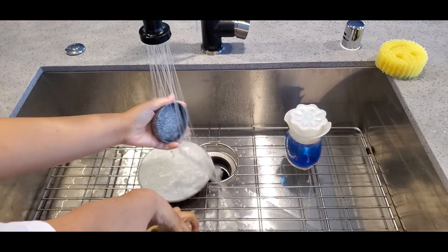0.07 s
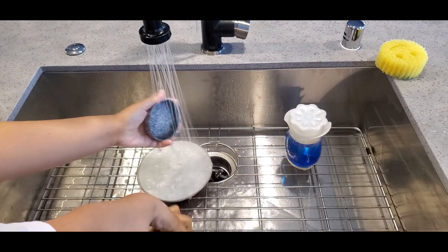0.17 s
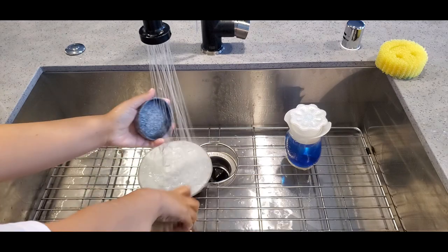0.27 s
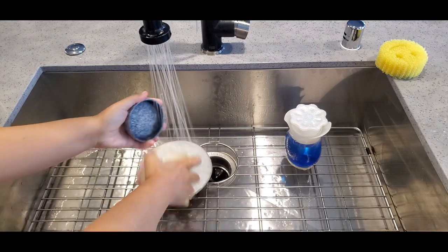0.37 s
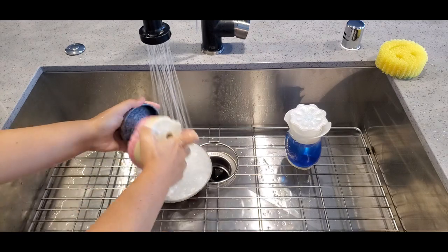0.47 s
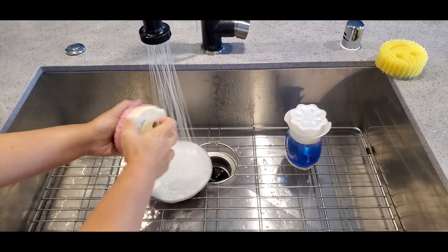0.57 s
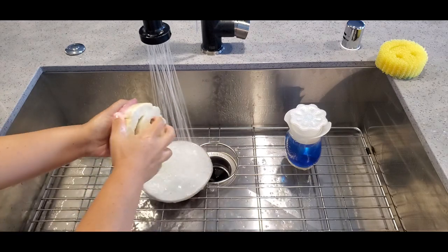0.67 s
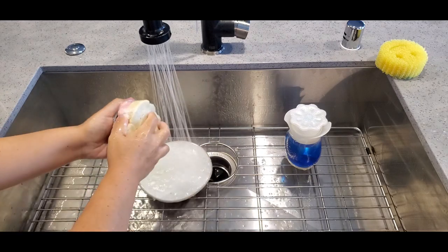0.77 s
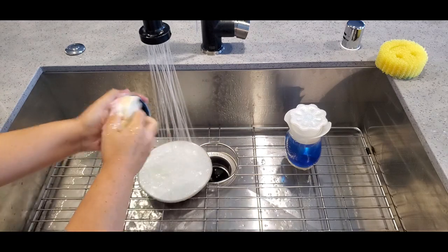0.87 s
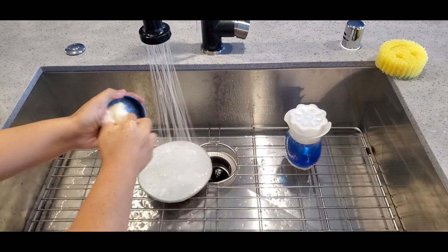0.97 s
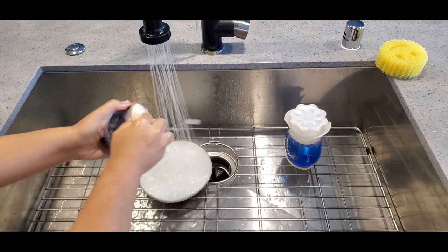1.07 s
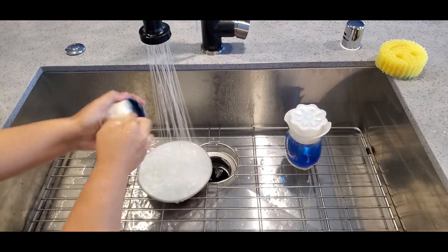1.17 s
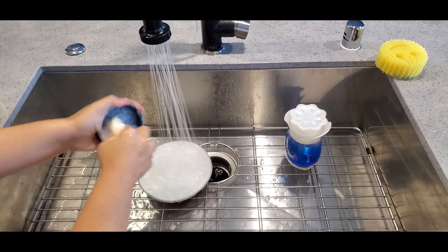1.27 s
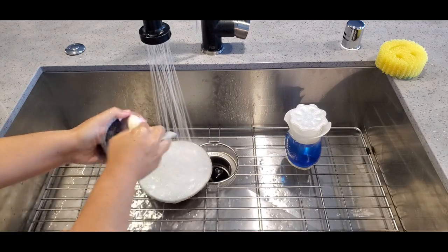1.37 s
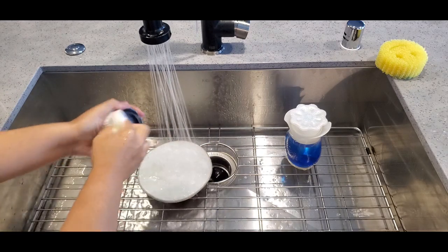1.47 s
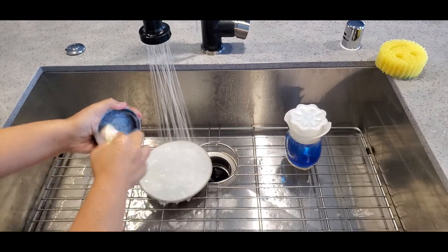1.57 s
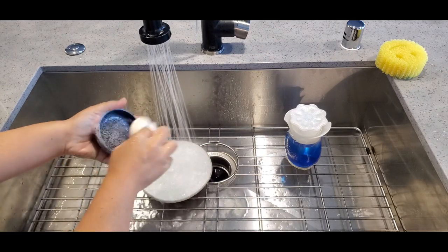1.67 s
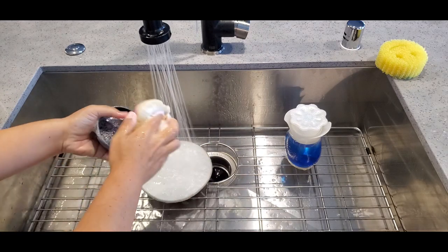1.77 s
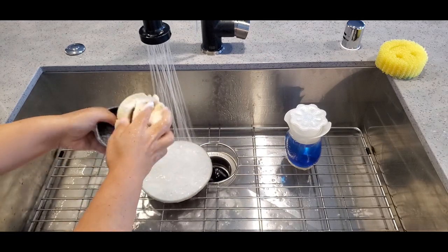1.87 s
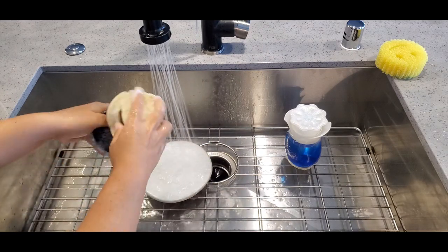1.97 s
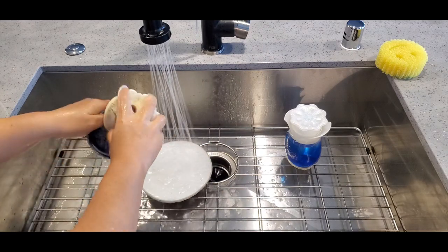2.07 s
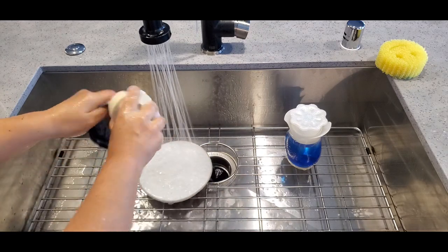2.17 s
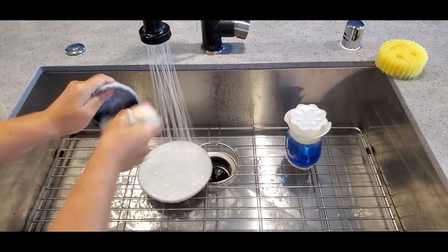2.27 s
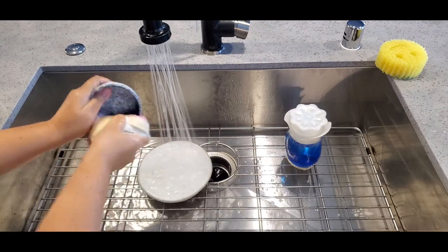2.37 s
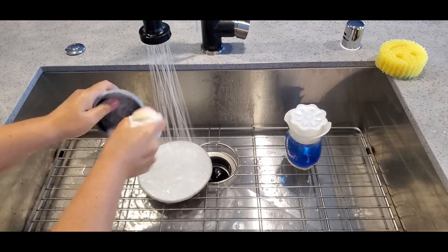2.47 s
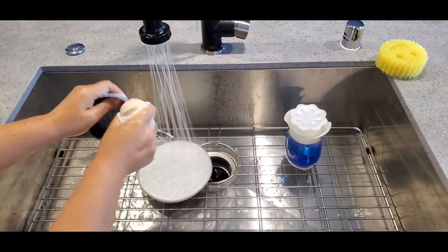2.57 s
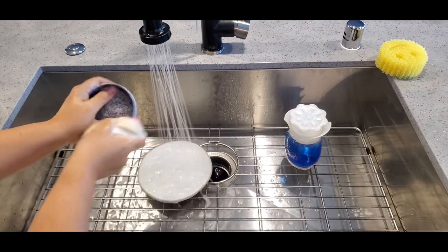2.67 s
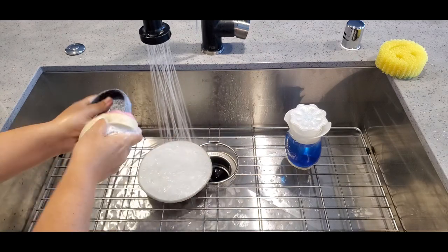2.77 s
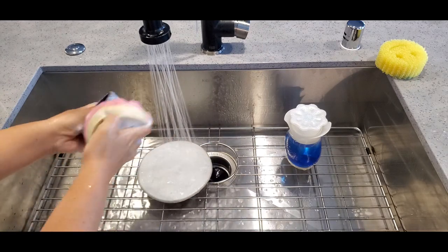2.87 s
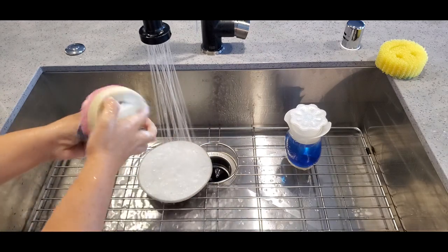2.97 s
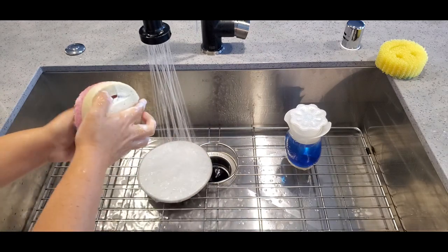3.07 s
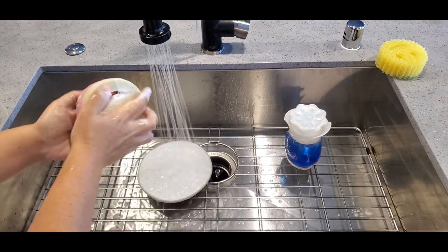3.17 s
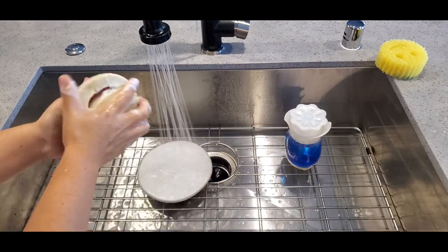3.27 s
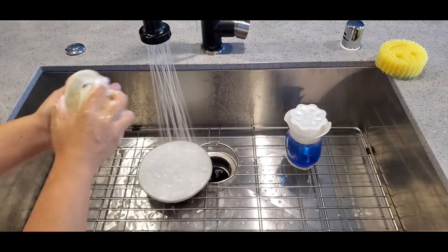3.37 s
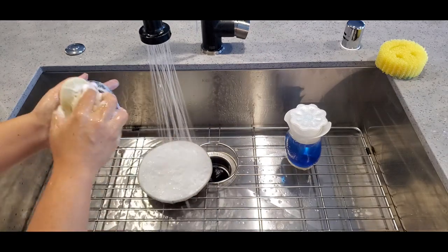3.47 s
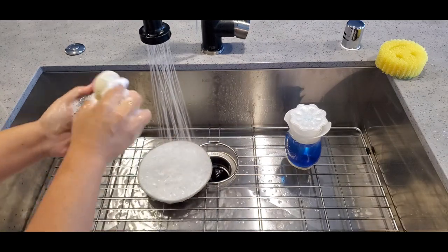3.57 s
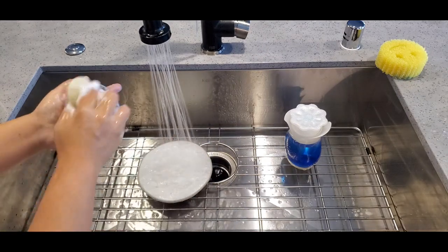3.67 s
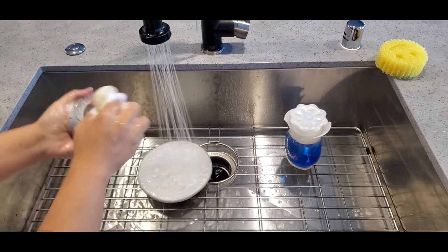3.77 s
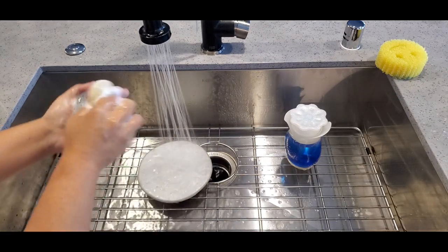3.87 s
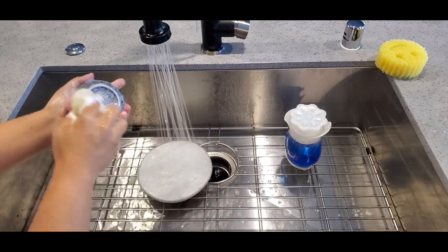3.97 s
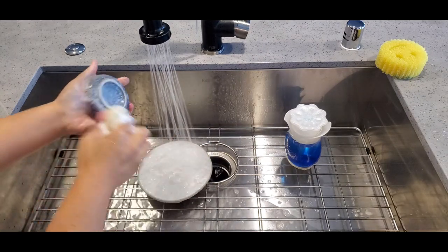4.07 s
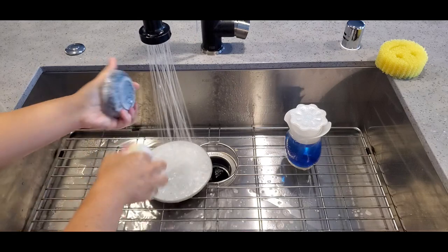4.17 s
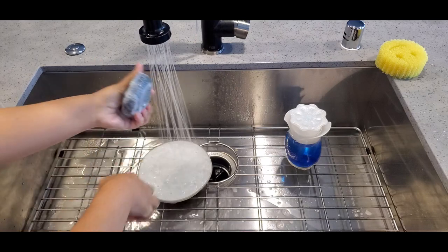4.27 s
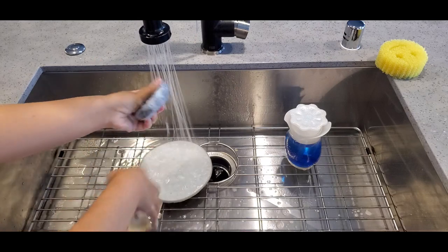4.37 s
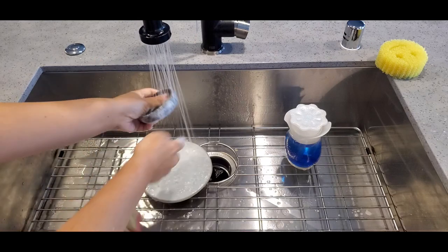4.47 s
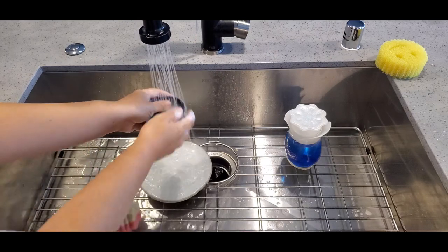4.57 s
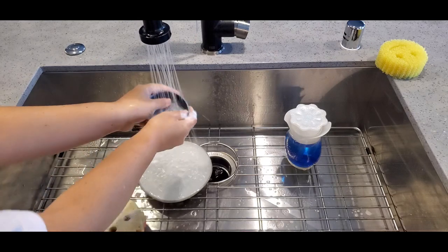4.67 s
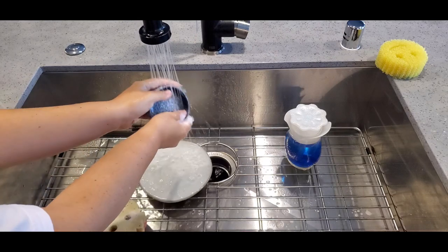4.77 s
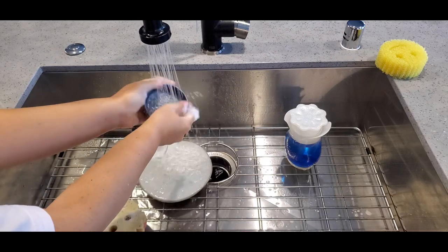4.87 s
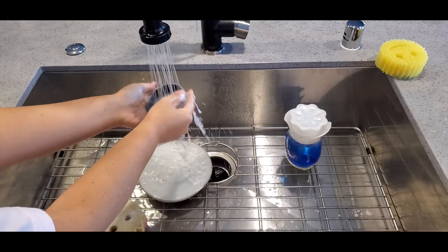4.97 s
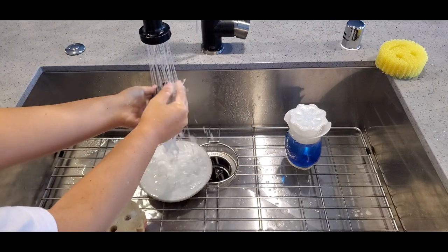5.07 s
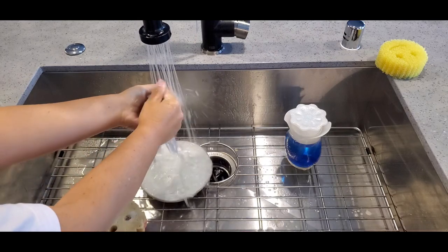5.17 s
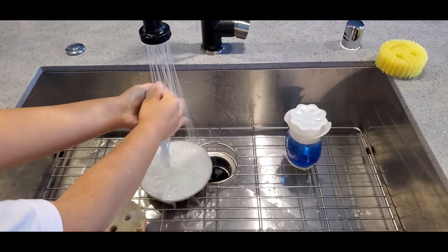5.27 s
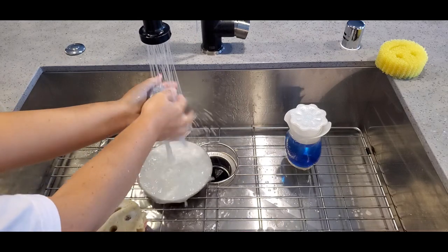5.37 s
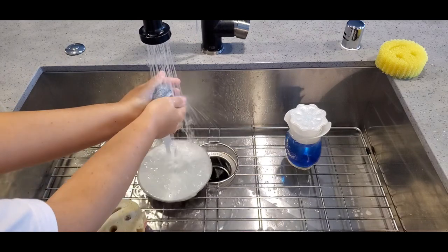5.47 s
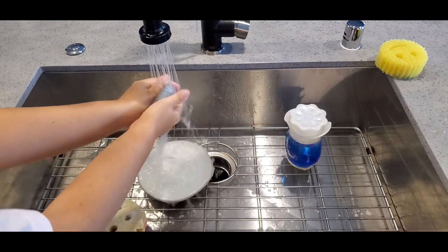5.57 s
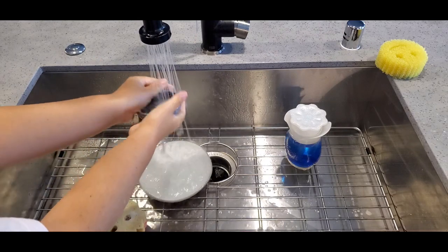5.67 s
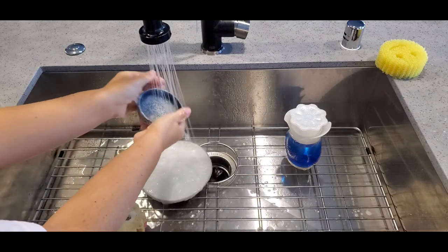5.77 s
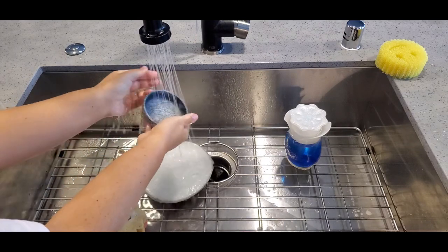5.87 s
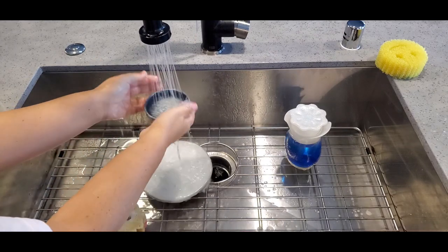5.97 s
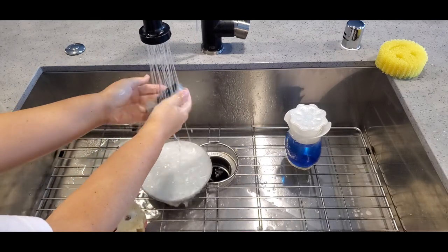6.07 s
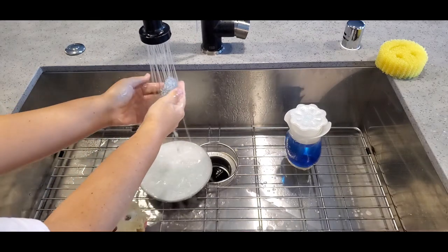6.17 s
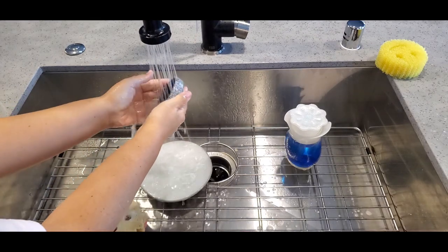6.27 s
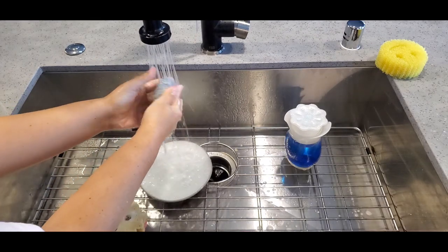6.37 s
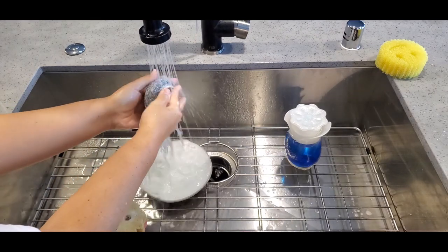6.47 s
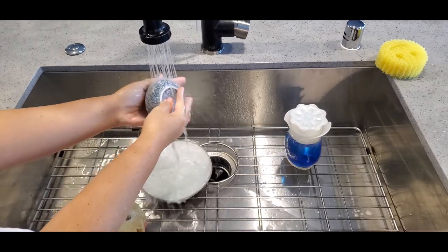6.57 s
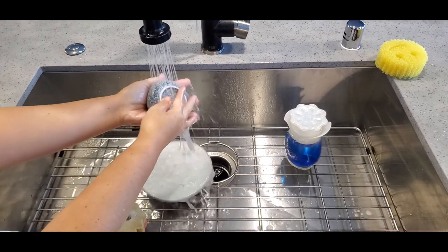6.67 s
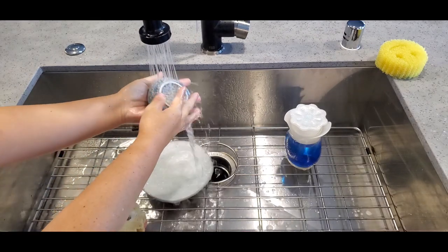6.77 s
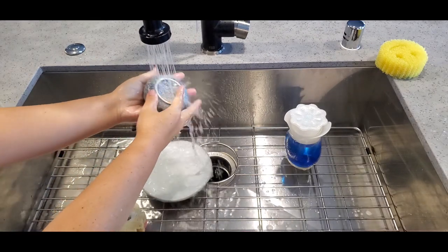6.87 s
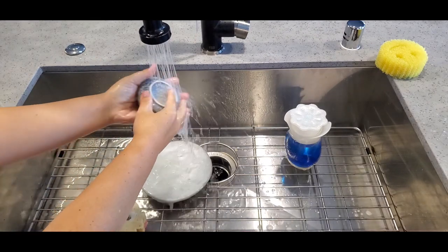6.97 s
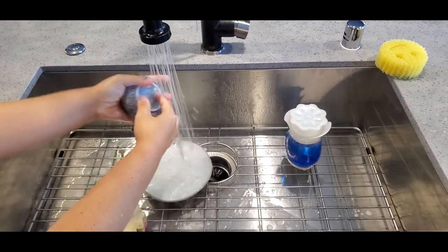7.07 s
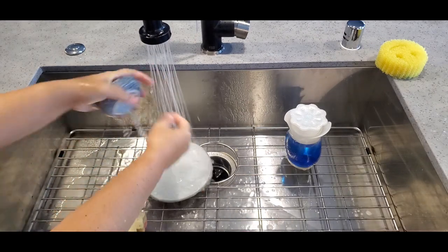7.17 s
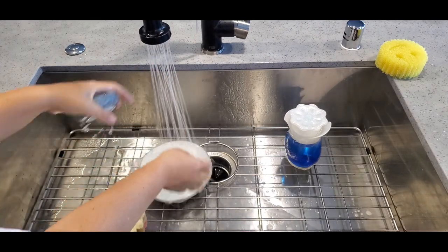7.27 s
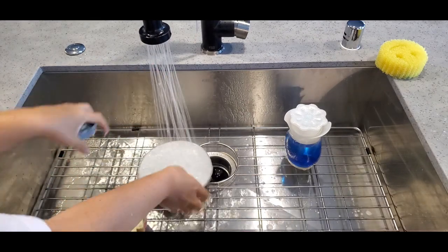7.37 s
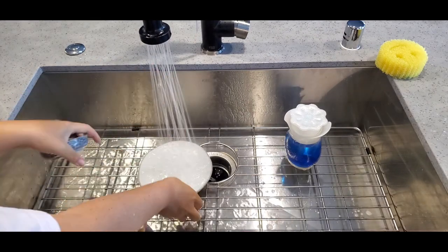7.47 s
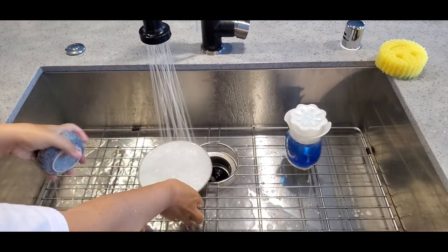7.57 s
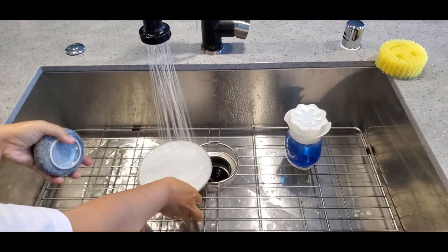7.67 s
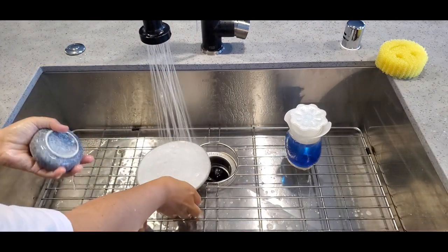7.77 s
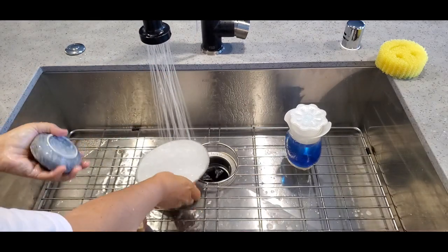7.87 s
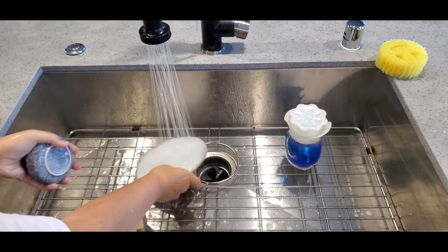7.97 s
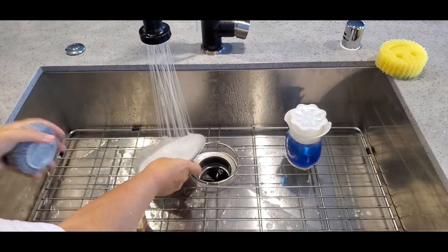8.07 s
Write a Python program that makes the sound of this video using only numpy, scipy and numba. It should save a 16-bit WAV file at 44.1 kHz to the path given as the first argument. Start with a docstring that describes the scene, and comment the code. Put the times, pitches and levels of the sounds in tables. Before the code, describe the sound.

A kitchen tap sprays into a steel sink throughout, heard close and slightly to the left, over a low basin rumble and faint room hum. It opens with a soft thump and small sloshes as water spills from a cup. From about 0.7 to 4.4 seconds the spray is a steady, bright spatter, bubbling into a shallow bowl, with two faint ticks around 1.2 and 1.5 seconds. From 4.5 to 7.2 seconds hands rinse the cup in the stream: the spray becomes quieter and patchy, with scattered drips, splashes and short gurgles, and dull thumps near 4.7 and 6.5 seconds. At about 7.2 seconds water sloshes out and the full spray and bubbling return. From 7.3 seconds to the end, just after 8, several light, hollow knocks sound as the bowl bumps the sink rack.

```python
"""A kitchen tap sprays into a brimming bowl on the rack of a steel sink while a cup is scrubbed and rinsed.
The jets spatter as dense droplet clicks and drive ringing bubbles into the bowl; hands in the spray
muffle this and shed drops. Water sloshes in cup and bowl at the pitch of the trapped air.
The tub rumbles, and its modes boom when it is bumped; the kitchen hums below."""
import sys
import numpy as np
from scipy import signal
from scipy.fft import rfft, irfft, next_fast_len
from scipy.io import wavfile
from numba import njit

SR = 44100
rng = np.random.default_rng(int(sys.argv[2]) if len(sys.argv) > 2 else 0)


def generate_wav(sig):
    """Save sig (samples, or channels by samples) to the path in sys.argv[1] as 16-bit PCM at SR."""
    pcm = np.round(np.clip(np.atleast_2d(sig).T, -1, 1) * 32767).astype(np.int16)
    wavfile.write(sys.argv[1], SR, pcm)


N = 358091
FFT_SIZE = next_fast_len(N)
BIN_HZ = np.maximum(np.arange(FFT_SIZE // 2 + 1) * SR / FFT_SIZE, 1)
CUTOFF_HZ = 15780


def from_db(db):
    """dB to gain."""
    return 10 ** (np.asarray(db) / 20)


def in_time(rows, at_s):
    """Columns of a curve table at the given times."""
    t_s, *columns = np.transpose(rows)
    return [np.interp(at_s, t_s, column) for column in columns]


def at_hz(rows, hz):
    """Spectrum table, interpolated over log frequency."""
    f_hz, values = np.transpose(rows)
    return np.interp(np.log(hz), np.log(f_hz), values)


def drift(rate_hz):
    """Slow random curve, rms 1."""
    hop = 20
    pole = np.exp(-2 * np.pi * rate_hz * hop / SR)
    slow = signal.lfilter([1], [1, -2 * pole, pole ** 2], rng.standard_normal(N // hop + 3002))[3000:]
    return np.interp(np.arange(N) / hop, np.arange(len(slow)), slow / np.sqrt(np.mean(slow ** 2)))


# Stereo field: f/Hz, left-right correlation
CORRELATION = [(60, 0.92), (130, 1), (290, 0.77), (640, -0.32), (1410, -0.41), (3100, 0.46), (6820, -0.41),
               (15000, 0.049)]


def coloured(pair, spectrum, flicker_db=0, flicker_hz=0):
    """Two independent streams to shaped stereo, mid rms 1; strong treble third-octaves can flicker."""
    mid, side = rfft(pair, FFT_SIZE) * from_db(at_hz(spectrum, BIN_HZ))
    alike = np.clip(at_hz(CORRELATION, BIN_HZ), -.95, .99)
    stereo = np.sqrt(1 + alike) * mid + np.sqrt(1 - alike) * side * [[1], [-1]]
    stereo[1] *= np.exp(-4j * np.pi * BIN_HZ / SR)  # right lags 2 samples
    out = irfft(stereo, FFT_SIZE)[:, :N]
    for octave in np.arange(np.log2(2500), 14, 1 / 3):
        if flicker_hz and at_hz(spectrum, 2 ** octave) > -15:
            window = np.cos(np.pi / 2 * np.clip(3 * (np.log2(BIN_HZ) - octave), -1, 1)) ** 2
            band = irfft(stereo * window, FFT_SIZE)[:, :N]
            out += band * (from_db(flicker_db * drift(flicker_hz)) - 1)
    return out / np.sqrt(np.mean(out.mean(axis=0) ** 2))


def impacts(per_s, uneven_db):
    """Two streams of droplet clicks of uneven size."""
    sizes = from_db(uneven_db * np.minimum(rng.exponential(1, (2, N)), 5)) * rng.standard_normal((2, N))
    return sizes * (rng.random((2, N)) < per_s / SR)


# Spray as hands and cup move through the jets: t/s, spatter level/dB, mist level/dB
SPRAY_LEVELS = [(0.0, -55, -49), (0.05, -49.5, -38), (0.09, -50.5, -42), (0.16, -40, -36.5),
                (0.36, -41.5, -34), (0.5, -39, -37.5), (0.75, -37, -33.5), (4.34, -36.5, -33.5),
                (4.52, -42, -40), (4.64, -44.5, -35.5), (4.74, -48, -45), (4.82, -43.5, -39.5),
                (4.98, -49, -40.5), (5.06, -52.5, -42.5), (5.17, -49.5, -41), (5.2, -43, -40),
                (5.28, -43, -42), (5.34, -50, -48), (5.76, -51.5, -41.5), (5.79, -44.5, -37.5),
                (5.92, -43, -35.5), (6.0, -49.5, -38), (6.12, -41.5, -40), (6.37, -48, -42),
                (6.41, -51, -48), (6.47, -47, -44), (6.69, -49.5, -47), (6.89, -45.5, -42),
                (6.99, -50, -43), (7.05, -44, -40), (7.25, -40, -37), (7.45, -37.5, -33.5),
                (7.87, -37, -34), (8.12, -45, -39)]
# Droplet spectra, coarse to fine: f/Hz, relative density/dB
SPATTER_SPECTRUM = [(60, -48), (300, -19.5), (700, -13), (1300, -3.5), (2500, -1), (4000, 0), (5500, 0),
                    (6500, -0.5), (7600, 1), (8400, -10.5), (10000, -53), (16000, -52)]
SIZZLE_SPECTRUM = [(500, -55), (4000, -41), (7500, 1), (8500, -0.5), (10000, 2), (11300, -5), (12500, -12),
                   (16000, -40)]
MIST_SPECTRUM = [(500, -50), (5000, -25), (10000, -7), (11500, 1.5), (12500, 3.5), (13500, 2.5), (15200, 8),
                 (16500, -12.5)]


def spray():
    """Jets break into spatter, sizzle and mist; hands make them quieter and patchier."""
    spatter_db, mist_db = in_time(SPRAY_LEVELS, np.arange(N) / SR)
    open_jets_db = -37
    sizzle_db = -40.5 + 1.29 * (spatter_db - open_jets_db)  # sinks faster than the spatter
    broken = np.clip((-31.5 - spatter_db) / 11, .3, 1)
    gusts = drift(rate_hz=54)  # uneven break-up swells all three together
    spatter = coloured(impacts(14000, uneven_db=2), SPATTER_SPECTRUM, 2.82 * broken, flicker_hz=14)
    sizzle = coloured(impacts(9000, uneven_db=2), SIZZLE_SPECTRUM, 3 * broken, flicker_hz=14)
    mist = coloured(impacts(9000, uneven_db=-1), MIST_SPECTRUM, flicker_db=1, flicker_hz=17)
    return (from_db(spatter_db + .34 * gusts) * spatter
            + from_db(sizzle_db + .27 * gusts) * sizzle
            + from_db(mist_db + .18 * gusts) * mist)


@njit
def ring_bubbles(start, hz, gain, cycles, rise, swell):
    """Each bubble is a sine that swells, decays 60 dB per `cycles` and climbs as it nears the surface."""
    out = np.zeros((2, N))
    for i in range(len(hz)):
        t60_samples = cycles[i] / hz[i] * SR
        fade, step = 1000 ** (-1 / t60_samples), 2 * np.pi * hz[i] / SR
        phase, level = 0., 1.
        for n in range(min(int(.55 * t60_samples), N - max(start[i, 0], start[i, 1]))):
            phase += step * (1 + rise[i] * n / t60_samples)
            level *= fade
            sample = np.sin(phase) * level * min(1, n / (swell * t60_samples))
            out[0, start[i, 0] + n] += gain[i, 0] * sample
            out[1, start[i, 1] + n] += gain[i, 1] * sample
    return out


def scattered(born_s, hz, level_db, cycles, rise, lag_samples, pan_db):
    """Bubbles at scattered spots, each with its own balance, stereo lag and ring time."""
    pan, lag, ring = rng.standard_normal((len(hz), 3)).T
    gain = from_db(level_db[:, None] + pan_db * pan[:, None] * [1, -1])
    delay = np.clip(20 + (lag_samples * lag[:, None] + 1) * [-1, 1], 0, 40)
    start = (born_s[:, None] * SR + delay).astype(np.int64)
    return ring_bubbles(start, hz, gain, cycles * from_db(4.84 * ring), rise, swell=.08)


# Flow into the bowl: t/s, large-bubble level/dB, small-bubble level/dB
BUBBLE_FLOW = [(0.0, -58, -58), (0.3, -65, -50), (0.5, -49, -43.5), (0.72, -44.5, -38),
               (1.05, -40.5, -36.5), (2.0, -39.5, -37.5), (4.4, -39, -35.5), (4.5, -57, -53),
               (4.62, -62, -69), (4.84, -51, -47), (4.9, -41, -50), (5.05, -55.5, -61.5),
               (5.75, -68, -52.5), (6.1, -51, -50), (6.3, -48, -51), (6.38, -55, -51), (6.7, -50, -53.5),
               (7.01, -66, -64), (7.07, -53, -52), (7.27, -49, -42.5), (7.42, -60, -47.5), (7.51, -47, -45),
               (7.57, -37.5, -39.5), (7.82, -47, -42.5), (8.0, -54, -56), (8.12, -46.5, -51)]
# Bubble strength by pitch: f/Hz, relative level/dB
BUBBLE_SPECTRUM = [(950, -23), (1150, -10), (1270, -15), (1340, 9.5), (1500, 5), (1900, 6.5), (2400, 5),
                   (3000, 6.5), (3800, -1.5), (5500, 2), (7600, 6), (9000, -12)]


def jet_bubbles(count, cycles, max_rise, uneven_db, split_hz):
    """Jets drive down bubbles: large ones surge slightly, the tiniest follow the spatter."""
    when, pitch, size, climb = rng.random((count, 4)).T
    born_s = when * (N / SR - .002)
    low_hz, high_hz = BUBBLE_SPECTRUM[0][0], BUBBLE_SPECTRUM[-1][0]
    hz = low_hz * (high_hz / low_hz) ** pitch
    large_db, small_db = in_time(BUBBLE_FLOW, born_s)
    large_db += 1.2 * drift(rate_hz=12)[(born_s * SR).astype(int)]
    tiny_db = in_time(SPRAY_LEVELS, born_s)[0]
    flow_db = np.select([hz < split_hz, hz < 2 * split_hz], [large_db, small_db], tiny_db)
    size_db = -11 - uneven_db * np.log(np.maximum(size, .01))  # one bubble against its swarm
    level_db = flow_db + at_hz(BUBBLE_SPECTRUM, hz) + size_db
    return scattered(born_s, hz, level_db, cycles, max_rise * climb, lag_samples=1.6, pan_db=3.06)


# Bowl resonances: f/Hz, bandwidth/Hz, relative level/dB
BOWL_MODES = [(1107, 123, 2.5), (1334, 13.4, 6), (1473, 30, -4.5), (1655, 24, 3.5), (1777, 11, 0.5),
              (1736, 12, -6), (1992, 15, -7.5), (2165, 13.5, 7.5), (2632, 70, -5), (3070, 55, 2.5),
              (3550, 40, -13), (4230, 40, -11)]


def bowl_ring(bubbles, ring_db):
    """The bowl rings along with the bubbles, its modes alternating in sign."""
    out = bubbles.copy()
    for k, (hz, width_hz, db) in enumerate(BOWL_MODES):
        r, w = np.exp(-np.pi * width_hz / SR), 2 * np.pi * hz / SR
        gain = (1 - r * r) / 2 * from_db(db + ring_db) * (-1) ** k
        out += signal.lfilter([gain, 0, -gain], [1, -2 * r * np.cos(w), r * r], bubbles)
    return out


def trickle(count, drip_db, cycles):
    """Small drips patter at random, louder while hands break the jets."""
    when, pitch, size = rng.random((count, 3)).T
    born_s = when * (N / SR - .002)
    hz = np.minimum(1500 * 10.5 ** pitch, CUTOFF_HZ)
    broken = np.clip((-40 - in_time(SPRAY_LEVELS, born_s)[0]) / 7.6, .01, 1)
    level_db = drip_db - 4.6 * np.log(np.maximum(size, .02)) + 20 * np.log10(broken)
    return scattered(born_s, hz, level_db, cycles, rise=np.full(count, .08), lag_samples=2.8, pan_db=1.7)


# Tub rumble: f/Hz, relative density/dB
RUMBLE_SPECTRUM = [(18, -43), (30, -41), (65, -5), (86, -8), (102, 1.5), (150, -8), (179, -1.5), (205, -4),
                   (237, -0.5), (285, 1), (305, -6.5), (326, -5.5), (420, -8), (550, -33), (920, -120)]


def tub_rumble(level_db, waver_db):
    """Low, wavering noise of the sink tub."""
    gain = from_db(level_db + waver_db * drift(rate_hz=5))
    return gain * coloured(rng.standard_normal((2, N)), RUMBLE_SPECTRUM)


# Kitchen background: f/Hz, relative density/dB
HUM_SPECTRUM = [(40, -4), (190, 0), (330, 1), (769, 4), (998, 0), (1470, 3), (2250, -16), (2920, -7),
                (4000, -7), (5200, -15.5), (8800, -120)]


def kitchen_hum(level_db):
    """Steady broad noise of the room."""
    return from_db(level_db) * coloured(rng.standard_normal((2, N)), HUM_SPECTRUM)


# Sloshes in cup and bowl: start t/s, end t/s, start f/Hz, end f/Hz, level/dB
SLOSH_GLIDES = [(0.027, 0.072, 3450, 4430, -36), (.12, .19, 5800, 5700, -33), (0.146, .2, 2500, 2620, -42),
                (0.224, .32, 4300, 4900, -31), (0.33, 0.421, 2730, 3100, -34.5),
                (0.466, 0.552, 2920, 2600, -35), (2.301, 2.378, 1820, 1950, -40),
                (2.484, 2.532, 1340, 1340, -37), (4.86, 4.991, 1160, 1270, -37.5),
                (5.15, 5.179, 1300, 1170, -45), (5.225, 5.331, 2960, 3200, -39),
                (5.801, 5.933, 2370, 2700, -42), (6.073, 6.164, 1350, 1420, -51),
                (6.16, 6.263, 1990, 2400, -37.5), (6.238, 6.342, 2360, 2100, -38.5),
                (6.42, 6.492, 2600, 2050, -39.5), (7.193, 7.306, 2820, 3050, -32.5),
                (7.221, 7.374, 2440, 2200, -35.5), (7.245, 7.371, 1530, 1630, -36)]


def sloshes(count, pitch_spread, cycles):
    """A bubble swarm follows the pitch of the trapped air space as it fills or empties."""
    start_s, end_s, start_hz, end_hz, db = np.transpose(SLOSH_GLIDES)[:, :, None]
    along = rng.random((len(SLOSH_GLIDES), count))
    detune, size = rng.standard_normal((2, *along.shape))
    born_s = start_s + (end_s - start_s) * along
    hz = (start_hz + (end_hz - start_hz) * along) * np.exp(pitch_spread * detune)
    level_db = db + 4.2 * size + 10 * np.log10(np.sin(np.pi * along) + .071)
    return scattered(born_s.ravel(), hz.ravel(), level_db.ravel(), cycles,
                     rise=np.full(hz.size, .03), lag_samples=2.4, pan_db=1.5)


# Single drops and gulps: t/s, level/dB, f/Hz, t60/cycles
DROP_HITS = [(.038, -22.5, 1067, 53), (.056, -20, 4700, 14), (.16, -25, 2600, 14), (.161, -18, 4100, 14),
             (4.7286, -19, 1900, 8.1), (5.126, -14, 13500, 20), (5.138, -18, 12000, 18),
             (5.174, -31, 1104, 73), (5.246, -19, 9500, 14), (5.29, -19, 7650, 15),
             (5.4365, -14, 14000, 18), (5.449, -16, 14500, 20), (5.466, -22, 4500, 15),
             (5.4918, -21, 2220, 15), (5.5575, -10, 13000, 16), (5.578, -22, 4700, 12),
             (5.661, -29, 2480, 20), (5.7133, -27.5, 1520, 9), (5.78, -12, 14500, 20),
             (5.83, -29, 2000, 22), (5.8744, -30, 2020, 22), (6.0857, -25, 1370, 16),
             (6.426, -26, 2510, 18), (6.453, -29, 1950, 10), (6.555, -18, 3900, 11), (6.59, -22, 3880, 12),
             (6.618, -27, 2280, 15), (6.6304, -33, 4600, 11), (6.6985, -22, 2900, 16),
             (6.7578, -17, 6000, 11), (6.958, -25, 4050, 10), (7.042, -5.5, 10800, 7.5),
             (7.0664, -26, 1326, 28), (7.104, -16.5, 3970, 14), (7.1944, -23, 2810, 25),
             (7.2522, -28, 3010, 14)]


def drops(left_db, rise):
    """Drops from hands and cup each ring one bubble, a little to the left."""
    t_s, db, hz, cycles = np.transpose(DROP_HITS)
    start = (np.column_stack([t_s, t_s]) * SR).astype(np.int64)
    gain = from_db(db[:, None] + [left_db, -left_db])
    return ring_bubbles(start, hz, gain, cycles, np.full(len(hz), rise), swell=.12)


# Bumps on rack and tub: t/s, boom level/dB, knock level/dB, tick level/dB
BUMP_HITS = [(0.045, -41, -62, -54), (0.106, -39, -57, -58), (1.201, -78, -50, -43.5),
             (1.501, -68, -44, -44.5), (4.679, -37.5, -64, -55.5), (6.519, -37, -52, -56),
             (6.57, -40, -63, -62), (6.872, -56, -43, -62), (7.296, -47, -41, -61),
             (7.446, -40, -32.5, -56), (7.488, -53, -34, -57), (7.681, -45, -37, -53),
             (7.741, -43, -42, -58), (8.001, -42, -34.5, -48), (8.069, -41, -35, -53)]
# Tub resonances: f/Hz, relative level/dB, t60/s, group (0 boom, 1 knock, 2 tick)
TUB_MODES = [(96, -0.5, 0.26, 0), (127.7, -9.5, 0.42, 0), (176.4, -11.5, 0.2, 1), (258.2, -6.5, 0.41, 1),
             (482, 7.5, 0.058, 2), (671, 6, 0.08, 2), (945, 6, 0.064, 2)]


def bumps(push_rad, uneven_db):
    """A soft push, a few cycles long, rings each tub mode with its own strength."""
    t_s, *group_db = np.transpose(BUMP_HITS)
    out = np.zeros(N)
    for hz, mode_db, t60_s, group in TUB_MODES:
        level_db = group_db[group] + mode_db + uneven_db * rng.standard_normal(len(t_s))
        clicks = np.zeros(N)
        clicks[(t_s * SR).astype(int)] = from_db(level_db)
        r, w = 10 ** (-3 / (t60_s * SR)), 2 * np.pi * hz / SR
        ring = signal.lfilter([0, np.sin(w)], [1, -2 * r * np.cos(w), r * r], clicks + 1e-18)
        swell = np.exp(-w / push_rad)  # band-pass pole, softens the onset
        gain = (1 - swell ** 2) / 2
        out += signal.lfilter([gain, 0, -gain], [1, -2 * swell * np.cos(w), swell ** 2], ring)
    return out


def basin_echo(x, t60_s, wet_db):
    """Steel walls add a short dense tail, independent per channel."""
    t_s = np.arange(round(.3 * SR)) / SR
    tail = rng.standard_normal((2, len(t_s))) * from_db(-60 * t_s / t60_s) * (t_s > .002)
    tail *= from_db(wet_db) / np.sqrt(np.sum(tail ** 2, axis=1, keepdims=True))
    return x + signal.fftconvolve(x, tail, axes=1)[:, :N]


def scene():
    """Spray, bubbles, drops and bumps over tub rumble and kitchen hum."""
    jets = spray()
    bubbles = jet_bubbles(count=40000, cycles=65.7, max_rise=.04, uneven_db=2.5, split_hz=1750)
    cup = sloshes(count=50, pitch_spread=.048, cycles=26.3)
    cup += drops(left_db=1.7, rise=.027)
    cup += trickle(count=1600, drip_db=-48, cycles=19)
    water = jets + bowl_ring(bubbles, ring_db=4.5) + basin_echo(cup, t60_s=.16, wet_db=-4)
    background = tub_rumble(level_db=-52.5, waver_db=1.5) + kitchen_hum(level_db=-49.5)
    return water + background + bumps(push_rad=8.4, uneven_db=3)


# Microphone balance: f/Hz, left minus right level/dB
MIC_BALANCE = [(60, 0.5), (150, 0), (380, 1.5), (950, 0.5), (2380, 1.5), (5980, 4.5), (15000, 4)]


def record(dry):
    """The left channel hears more treble; a steep low-pass cuts the top."""
    balance = from_db(at_hz(MIC_BALANCE, BIN_HZ) / 2 * [[1], [-1]])
    heard = irfft(rfft(dry, FFT_SIZE) * balance, FFT_SIZE)[:, :N]
    return signal.sosfilt(signal.ellip(14, .5, 75, CUTOFF_HZ, fs=SR, output="sos"), heard)


dry = scene()
out = record(dry)
generate_wav(out)
```